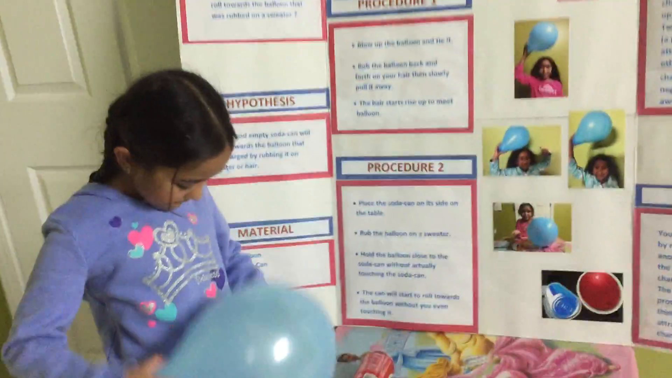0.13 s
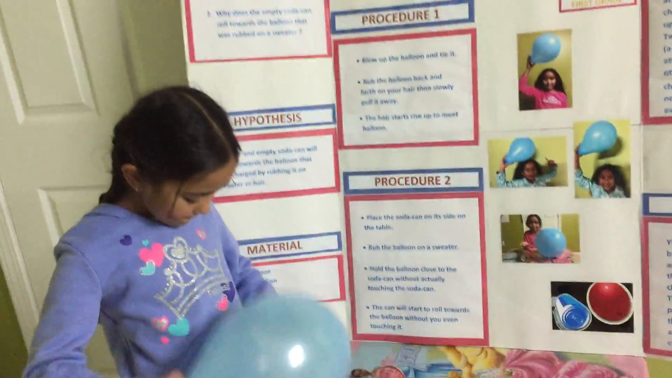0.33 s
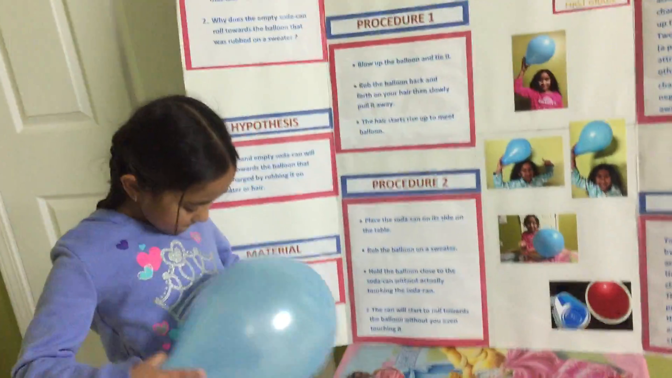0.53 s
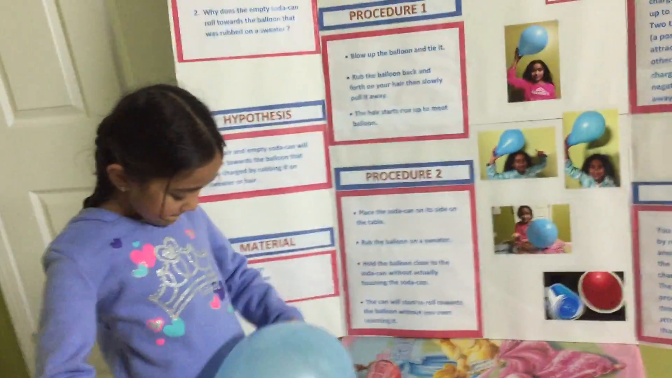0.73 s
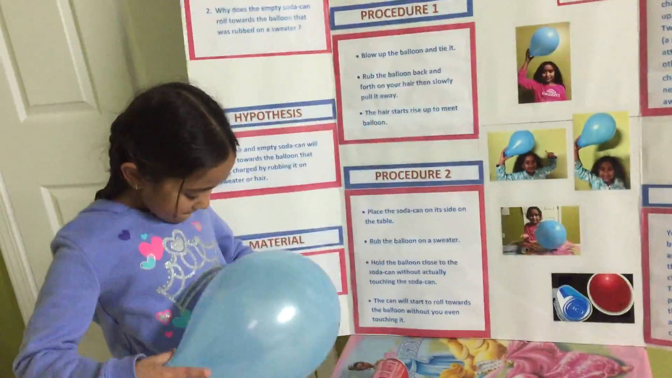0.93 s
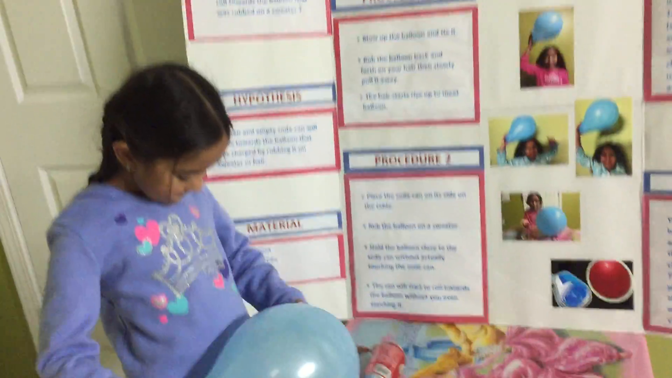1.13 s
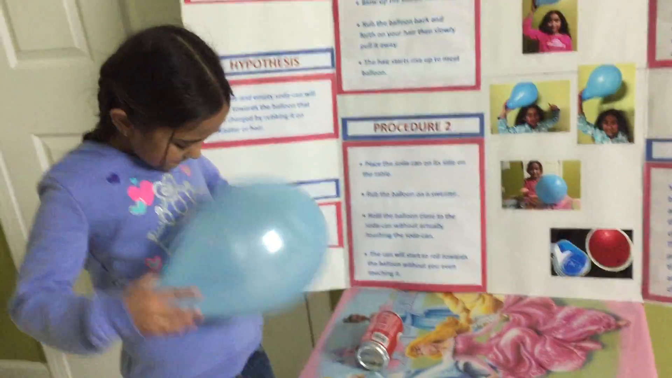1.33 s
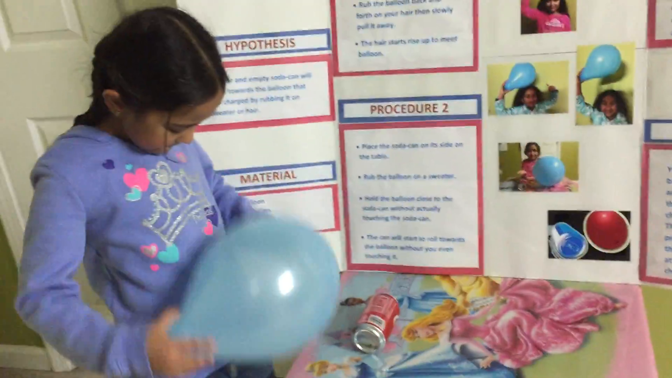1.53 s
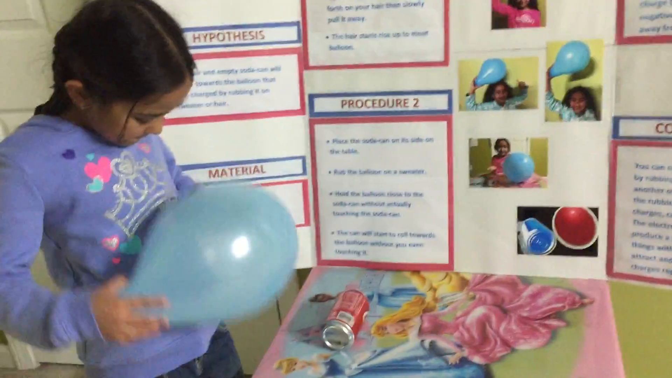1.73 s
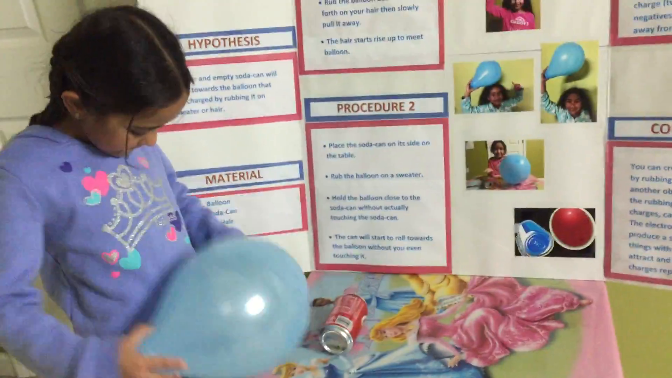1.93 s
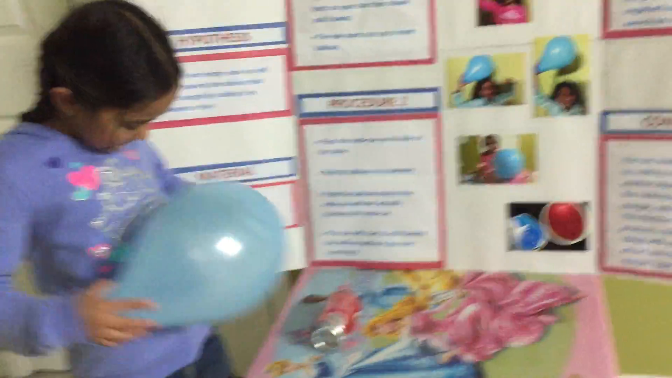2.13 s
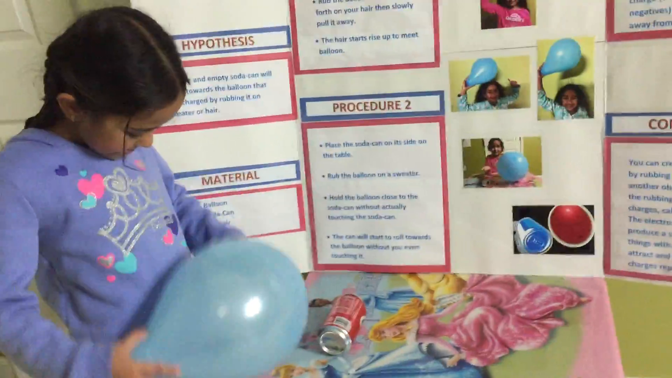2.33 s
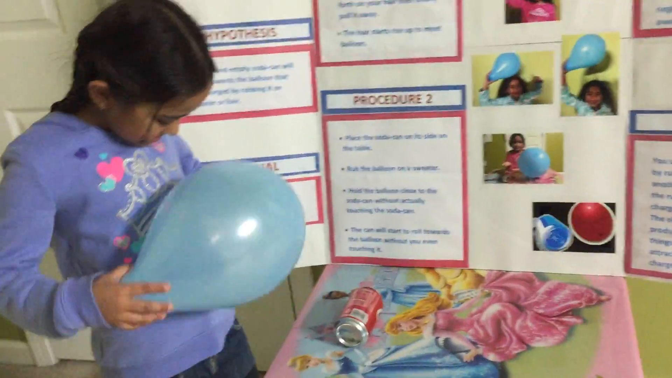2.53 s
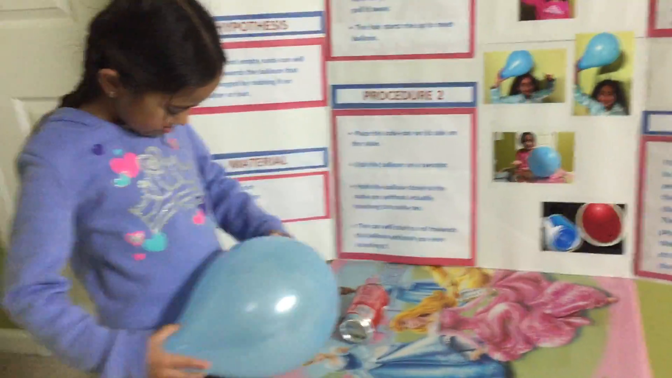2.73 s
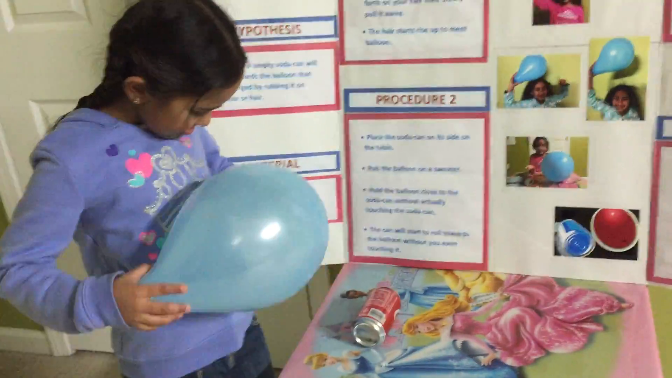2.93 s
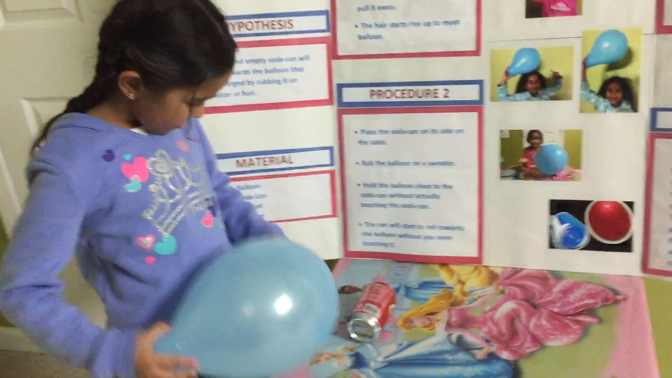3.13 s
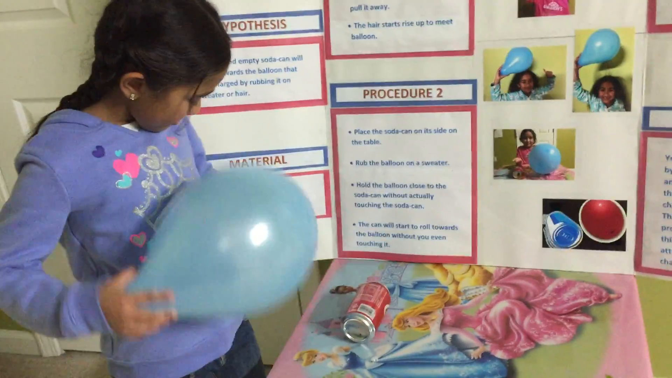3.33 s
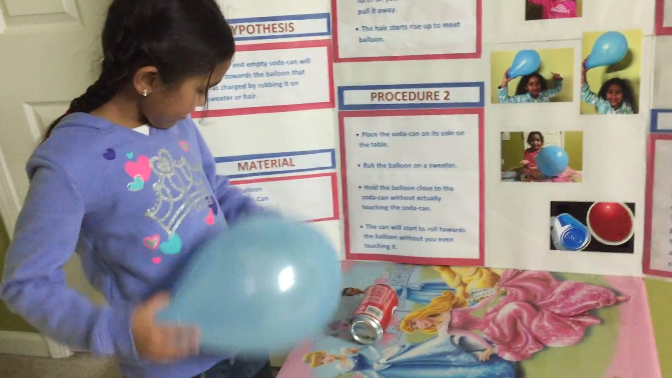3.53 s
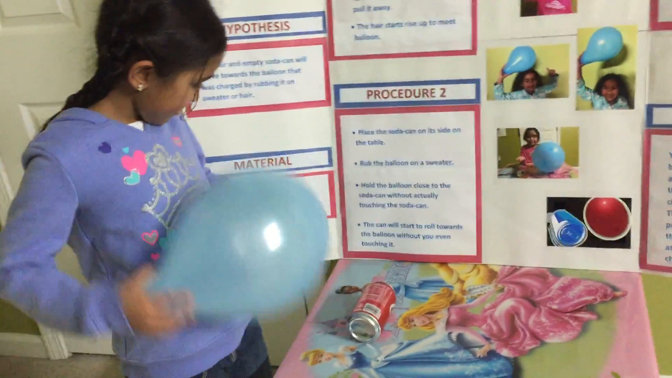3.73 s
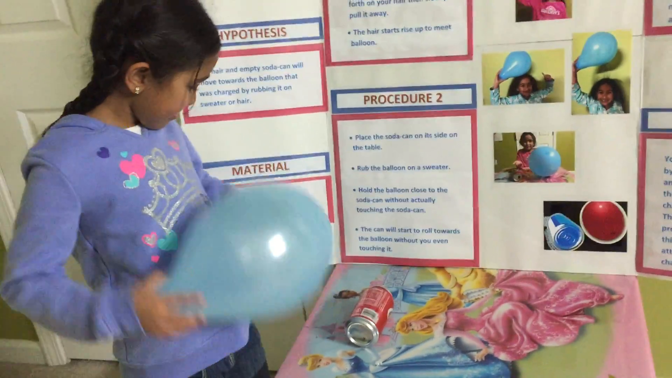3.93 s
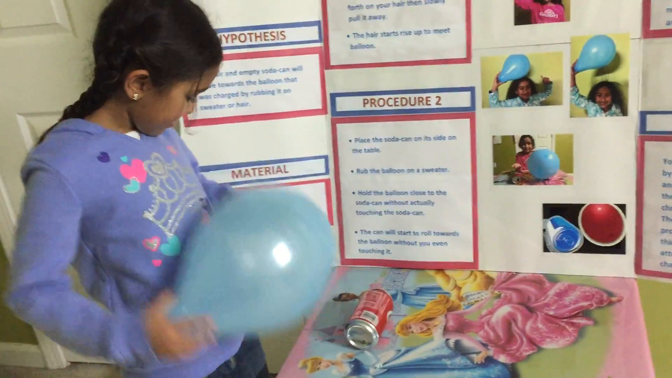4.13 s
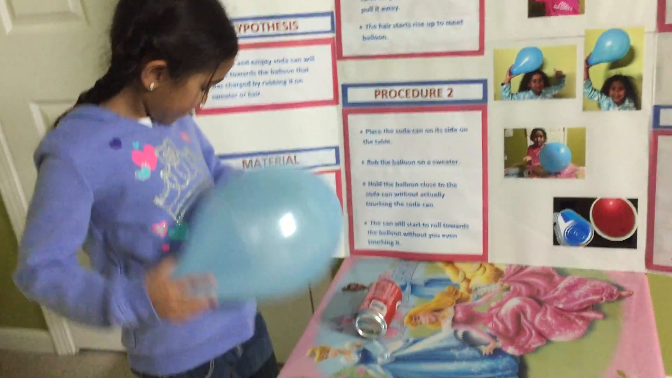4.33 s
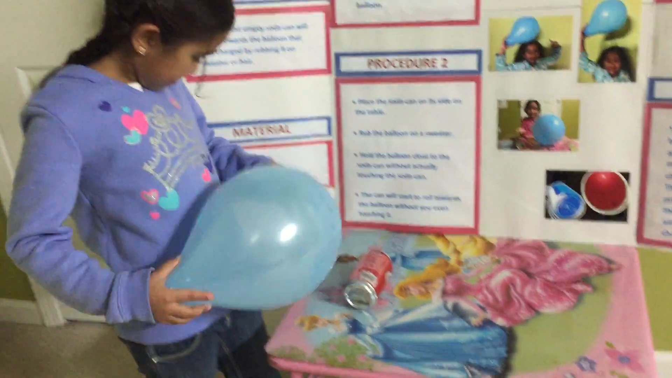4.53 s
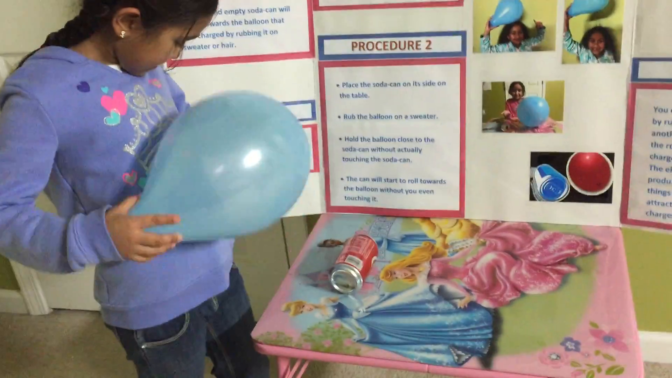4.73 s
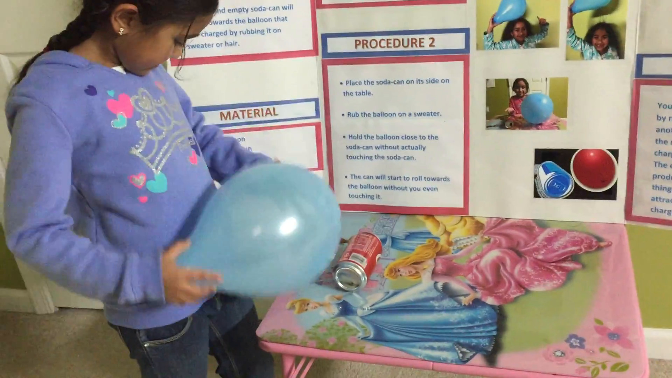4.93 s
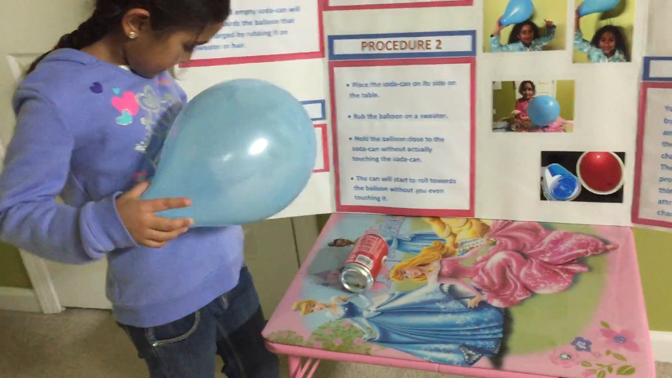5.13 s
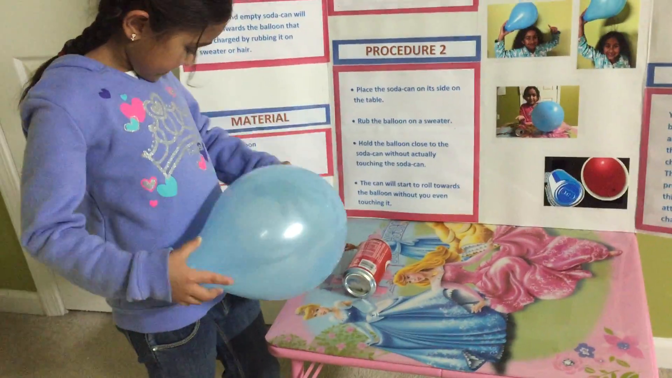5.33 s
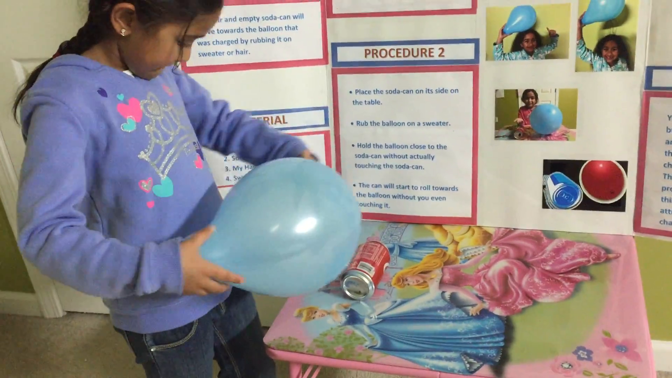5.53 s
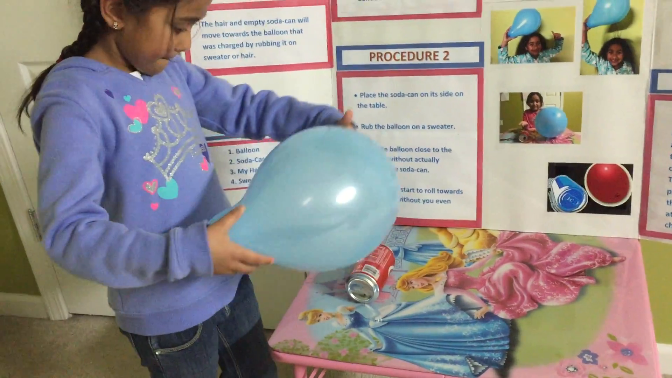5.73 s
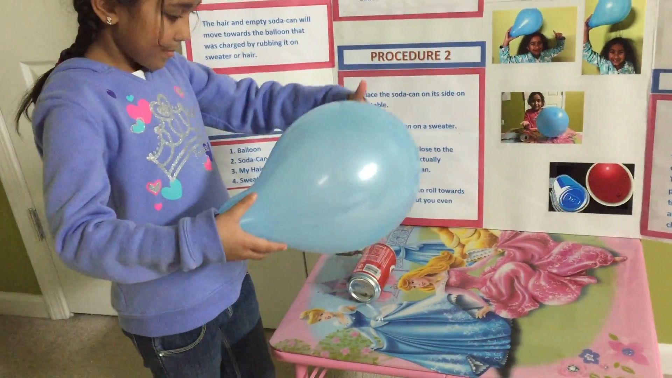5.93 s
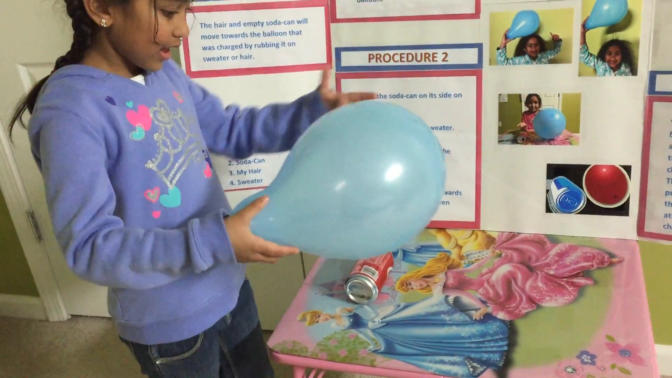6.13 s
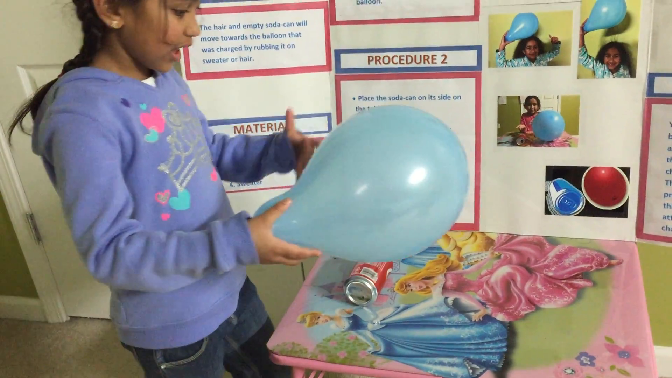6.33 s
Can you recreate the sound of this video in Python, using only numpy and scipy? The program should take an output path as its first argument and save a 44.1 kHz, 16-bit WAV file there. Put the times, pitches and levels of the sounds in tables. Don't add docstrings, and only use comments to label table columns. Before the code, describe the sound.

Brisk back-and-forth scratchy rubbing of an inflated rubber balloon on a knitted sweater, with scattered squeaky snaps and two loud, hollow pops of grip.

```python
import sys
import numpy as np
from scipy import signal
from scipy.fft import rfft, irfft, next_fast_len
from scipy.io import wavfile
from scipy.ndimage import uniform_filter1d

SR = 44100
rng = np.random.default_rng(int(sys.argv[2]) if len(sys.argv) > 2 else 0)


def attenuation_scalar(level_db):
    decades = np.asarray(level_db, float) / 20
    return 10 ** decades


def output_pcm(signal):
    pcm = np.clip(np.atleast_2d(signal).T, -1, 1) * 32767
    wavfile.write(sys.argv[1], SR, np.round(pcm).astype(np.int16))


N = 282151

# (turn [s], slip left at the turn [dB], rubbing strength [dB], skin ring over it [dB])
STROKES = [(-.14, -74, -56.5, -1), (0.164, -74, -55.5, -5), (0.392, -73.5, -56, -1),
           (0.635, -85, -55.5, -6), (0.871, -74, -56.5, 9.5), (1.104, -95, -57.5, -6),
           (1.302, -68, -58.5, -2), (1.525, -77, -54.5, -5.5), (1.75, -68.5, -55.5, -4),
           (1.954, -89, -55, -3), (2.15, -61, -56, -2.5), (2.338, -78, -54.5, -5.5), (2.516, -65, -55, 4),
           (2.704, -95, -54.5, -10), (2.892, -78, -55.5, -7), (3.101, -72.5, -57, -6),
           (3.256, -75, -58, -1.5), (3.446, -89, -56, -3.5), (3.622, -75, -59, -6), (3.808, -80, -54.5, -2),
           (3.983, -71, -55.5, -4.5), (4.183, -84, -54.5, -6.5), (4.369, -76, -56, -6),
           (4.55, -80, -54.5, -10), (4.721, -87.5, -57.5, -6), (4.892, -96, -54.5, -8),
           (5.067, -84, -54.5, -2.5), (5.287, -87, -55, -1), (5.5, -78, -66.5, 10.5)]
# (frequency [Hz], density [dB per Hz])
FIBRE_SPECTRUM = [(600, -37), (1500, -10.5), (3500, -4), (4900, -12), (5600, -1), (7000, -3.5),
                  (8200, -4.5), (9800, -2.5), (11500, 0.5), (14500, 1.5), (16500, -1)]
# (frequency [Hz], width [Hz], level [dB])
SKIN_MODES = [(640, 260, -13), (1000, 500, -12), (1460, 200, -6), (1900, 600, -6), (2450, 500, -3),
              (3000, 700, -4), (3700, 1100, -3), (4400, 900, -8)]
# (frequency [Hz], width [Hz], level [dB])
AIR_MODES = [(124, 27, 5.5), (227, 34, 1.5), (320, 130, 2.5)]
# (time [s], ring peak [dB], ring frequency [Hz], crack over the ring [dB])
TAUT_SNAPS = [(0.491, -40, 1500, 8.5), (.9078, -45.5, 1510, 11), (0.917, -35.5, 1490, 5.5),
              (0.9346, -31.5, 1460, 2), (1.3868, -38.5, 2740, 4), (1.5917, -46, 2380, 0),
              (1.6017, -36.5, 2830, -15), (1.7554, -44, 2500, -1.2), (1.774, -31, 2420, -5),
              (1.99, -43, 2710, -4), (1.9963, -40, 2540, -14), (2.0041, -32, 2670, -1),
              (2.012, -35.5, 2410, 4), (2.023, -33.5, 3500, 2), (2.049, -12.5, 2630, -12),
              (2.3498, -39.5, 2860, -18), (2.3774, -42.5, 2440, -8), (2.3801, -30.5, 2480, -8),
              (2.548, -33, 2000, 2), (2.5574, -34, 1640, 7), (3.267, -49.5, 2410, -11),
              (4.3482, -59, 3800, 17), (5.3524, -34, 3180, -2), (5.3555, -37.5, 2985, 16),
              (5.549, -33, 2340, 8), (5.5878, -20, 1190, 0.5), (5.5896, -26, 2540, -27),
              (5.679, -34, 1940, 7), (5.9376, -71.5, 2250, -16), (6.134, -77.5, 2460, 14)]
# (time [s], ring peak [dB], ring frequency [Hz], crack over the ring [dB])
DEEP_SNAPS = [(0.8932, -43.5, 4130, 10.5), (0.898, -44.5, 3300, 2.5), (0.9496, -35.5, 2560, 12.5),
              (0.9545, -25, 2740, 6), (1.1656, -55.5, 4560, -10.5), (2.04, -40, 2170, 3),
              (2.0455, -16, 1340, 6), (2.1706, -45, 2480, 6), (2.1834, -35.5, 2860, 5),
              (2.1900, -39.5, 2420, 0), (2.3640, -46.5, 2620, -12), (5.57, -64.5, 2500, 13.5),
              (2.5387, -37, 2430, 9.5), (2.595, -33.5, 1530, 11.5), (3.2277, -44.5, 4460, -2),
              (3.2962, -40, 2950, 6), (3.6414, -78, 3320, 32), (3.735, -47, 3330, 1),
              (4.0042, -46, 1320, 3), (4.0237, -35, 2450, -13), (4.2147, -48, 1520, 7),
              (4.2239, -36.5, 2730, 2), (4.3923, -58, 1309, -2), (4.4061, -39, 1500, 6),
              (5.4005, -20, 930, 12.5), (5.6396, -18, 2220, 3), (5.696, -44, 3420, -7),
              (5.7721, -27, 2340, 1.6), (5.9263, -40, 2450, -6)]
# (thump over the ring [dB], knock over the ring [dB])
TAUT_MOTION = (-21, -8.5)
DEEP_MOTION = (-10, 0.0)
# (delay [s], level for a snap of full force [dB])
AFTERSLIPS = [(.0014, -8.5), (.0029, -7), (.0058, -10.5)]
# (frequency [Hz], density [dB per Hz])
CRACK_SPECTRUM = [(300, -29.5), (1200, -11.5), (3000, -1.5), (4600, -2), (6300, 2), (8000, -7),
                  (10500, -4.5), (13000, -7.5), (16500, -15.5)]
# (frequency [Hz], t60 [s], level [dB])
KNOCK_MODES = [(600, 0.0086, 0.5), (814, 0.019, -6), (1210, .008, -13)]
# (frequency [Hz], t60 [s], level [dB])
THUMP_MODES = [(225, 0.011, -6.5), (318, 0.041, 2), (370, 0.045, 0.5)]
# (time [s], length [s], rms level [dB], dullness, scaling the
# treble cut [dB])
PEELS = [(0.872, 0.094, -50.5, 3), (0.951, 0.067, -48.5, 5), (1.593, 0.034, -57.5, 20),
         (1.667, 0.057, -51.5, -2), (1.996, 0.06, -55.5, 8), (2.04, 0.011, -31, -2.5),
         (2.14, 0.068, -49.5, 18), (2.54, 0.032, -50, 6), (2.591, 0.025, -47.5, -7),
         (3.218, 0.021, -52.5, 0), (4.007, 0.038, -48, 2), (4.386, 0.019, -53.5, 23),
         (5.345, 0.02, -38.5, 0), (5.404, 0.055, -40, 8.5), (5.43, .11, -54, 6), (5.557, 0.075, -50.5, 0),
         (5.582, 0.015, -36, 26), (5.65, 0.073, -48.5, 20), (2.055, 0.1, -47, 6.5), (5.919, .014, -57, 0.5),
         (5.67, 0.037, -50, 1.5)]
# (time [s], peak [dB])
BOOMS = [(0.491, -43.5), (0.953, -43), (1.161, -55), (1.389, -52), (1.615, -47.5), (1.669, -49),
         (2.046, -25), (2.179, -44.5), (2.596, -63), (3.003, -49), (3.3, -48), (3.881, -57), (4.018, -48),
         (5.194, -56.5), (5.353, -46.5), (5.402, -25), (5.588, -40), (5.638, -33.5), (5.681, -38.5),
         (5.773, -42), (5.923, -67)]
# (time [s], frequency [Hz], peak
# [dB], t60 [s])
PINGS = [(0.103, 1450, -55, 0.053), (0.105, 1730, -56, 0.055), (.957, 1650, -25, 0.019),
         (.999, 1380, -38, 0.018), (1.168, 756, -55, 0.024), (1.7744, 983, -32.5, 0.023),
         (1.776, 320, -48, 0.13), (2.047, 885, -18.5, 0.037), (2.05, 1570, -21, .02),
         (2.081, 1856, -28, 0.053), (2.547, 345, -37, 0.089), (2.594, 299, -35, 0.058),
         (3.296, 691, -46, .03), (3.74, 1513, -52.5, 0.078), (3.871, 207, -52, 0.068),
         (4.024, 1510, -41, 0.055), (4.024, 320, -37.5, 0.069), (4.352, 3880, -61, .011),
         (4.404, 333, -58, .088), (4.405, 1500, -40, .03), (5.402, 887, -15, 0.037),
         (5.402, 280, -20.5, 0.054), (5.6485, 1388, -29, 0.096), (5.774, 2191, -39, 0.045),
         (5.55, 870, -33, 0.019), (6.129, 8640, -50.5, .0062)]
# (delay [s], level [dB])
ECHOES = [(.0016, -15), (.0032, -12), (.0062, -15), (.0095, -18)]
# (frequency [Hz], t60 [s])
ROOM_DECAY = [(100, 0.21), (300, .25), (1000, 0.28), (3000, 0.2), (6500, 0.22), (8500, 0.21),
              (12000, 0.034)]
# (frequency [Hz], density [dB per Hz])
ROOM_TONE_SPECTRUM = [(25, -17), (64, -3), (110, -8.5), (245, -14.5), (300, -18), (850, -21), (2500, -25),
                      (5000, -32), (9000, -37), (15000, -35.5)]
# (frequency [Hz], gain [dB])
MICROPHONE = [(20, -14), (45, -10.5), (90, -4), (9700, 1.5), (10400, -3.5), (11200, -1.5)]


def rub():
    size_db = 1.2 * np.minimum(rng.exponential(1, N), 5) + 0.9 * drift(90) + 0.8 * drift(900)
    slips = patchy(attenuation_scalar(size_db) * rng.standard_normal(N), patchy_db=1.9)
    hiss = evened(coloured(slips, FIBRE_SPECTRUM))
    skin = sum(attenuation_scalar(db + 2.5 * drift(1400)) * evened(resonate(slips, hz, width))
               for hz, width, db in SKIN_MODES)
    air = sum(attenuation_scalar(db + 1.8 * drift(1500)) * evened(resonate(slips, hz, width))
              for hz, width, db in AIR_MODES)
    hiss_part = attenuation_scalar(5) * hiss * along_strokes(0, 0, 0, flat=1.43)
    skin_part = attenuation_scalar(-6) * evened(skin) * along_strokes(0, 0, 1, flat=0.92)
    air_part = attenuation_scalar(6) * evened(air) * along_strokes(-8, -14.5, 0.79, flat=1.0)
    return hiss_part + skin_part + air_part


def along_strokes(turn_db, top_db, per_skin, flat):
    rest_s, rest_db = 5.8, -90
    room_db, room_t60 = -3, 0.17
    turn_s, slip_db, rub_db, skin_db = np.transpose(STROKES)
    place = np.interp(np.arange(N) / SR, [*turn_s, rest_s], np.arange(len(turn_s) + 1))
    stroke = np.minimum(place.astype(int), len(turn_s) - 1)
    nearest_turn = np.round(place).astype(int)
    at_turn = attenuation_scalar(np.append(slip_db, rest_db)[nearest_turn] + turn_db)
    at_middle = attenuation_scalar(rub_db + top_db + per_skin * skin_db)[stroke]
    speed = 1 - (np.cos(np.pi * (place - stroke)) ** 2) ** flat
    power = (at_turn + (at_middle - at_turn) * speed) ** 2
    keep = attenuation_scalar(-120 / (room_t60 * SR))
    lingering = signal.lfilter([1 - keep], [1, -keep], power)
    return np.sqrt(power + attenuation_scalar(2 * room_db) * lingering)


def patchy(x, patchy_db):
    _, _, z = signal.stft(x, SR, nperseg=256)
    field = rng.standard_normal(z.shape[::-1]).T
    field = uniform_filter1d(field, size=5, axis=0)
    field = evened(uniform_filter1d(field, size=24, axis=1))
    return signal.istft(z * attenuation_scalar(patchy_db * field), SR, nperseg=256)[1][:len(x)]


def snaps():
    hard_db, slip_per_db = -24.5, 0.7
    slack_per_s, knock_per_crack = 60, 0.15
    rows = [(*row, *TAUT_MOTION) for row in TAUT_SNAPS] + [(*row, *DEEP_MOTION) for row in DEEP_SNAPS]
    out, cracks = np.zeros(N), np.zeros(N)
    chance = rng.random((len(rows), 8))
    for (s, db, hz, crack_db, thump_db, knock_db), c in zip(rows, chance):
        tear = torn_rubber()
        thump = sum(attenuation_scalar(d) * ring(f * (0.94 + 0.12 * c[7]), t60, 0) for f, t60, d in THUMP_MODES)
        knock = sum(attenuation_scalar(d) * ring(f * (0.922 + 0.26 * u), t60, 0)
                    for (f, t60, d), u in zip(KNOCK_MODES, c[2:]))
        add(out, s, attenuation_scalar(db + thump_db + 1) * thump)
        add(out, s, attenuation_scalar(db + knock_db + knock_per_crack * crack_db) * knock)
        force_db = min(db + max(crack_db, 0) / 2 - hard_db, 0)
        slips = [(0.00064, 0)] + [(delay, d + slip_per_db * force_db) for delay, d in AFTERSLIPS]
        for delay, slip_db in slips:
            f = hz * (1 - slack_per_s * delay)
            skin = ring(f, 0.004, 0)
            skin += attenuation_scalar(-1) * ring(f * (1.29 + 0.21 * c[0]), 0.0024, 6 * c[1])
            add(out, s + delay, attenuation_scalar(db + slip_db + 7.5) * skin)
            add(cracks, s + delay, attenuation_scalar(db + slip_db + crack_db + 12) * tear)
    return out + coloured(cracks, CRACK_SPECTRUM)


def torn_rubber():
    t = np.arange(600) / SR
    tear = rng.standard_normal(len(t)) * (attenuation_scalar(-17 - 60 * t / 0.006) + attenuation_scalar(-31 - 60 * t / 0.025))
    tear[0] = 1
    return tear / np.linalg.norm(tear)


def peels():
    out = np.zeros(N)
    grains = attenuation_scalar(3.4 * np.minimum(rng.exponential(1, N), 5)) * rng.standard_normal(N)
    grains *= rng.random(N) < 0.12
    grains *= attenuation_scalar(4.5 * drift(30))
    for s, length, db, dull_db in PEELS:
        run = grains[round(s * SR):][:round(length * SR)]
        spectrum = [(250, -12), (1500, 5.5), (3000, 1),
                    (6800, -0.7 * dull_db), (8200, -1.7 * dull_db), (15000, -2.5 * dull_db)]
        run = coloured(run, spectrum)
        add(out, s, attenuation_scalar(db) * evened(run) * signal.windows.tukey(len(run), 0.7))
    return out


def rings():
    boom_hz, boom_t60 = 134.5, 0.11
    out = np.zeros(N)
    for s, db in BOOMS:
        add(out, s, attenuation_scalar(db - 2.5) * ring(boom_hz, boom_t60, 0))
    for s, hz, db, t60 in PINGS:
        add(out, s, attenuation_scalar(db) * ring(hz, t60, 0))
    return out


def room(x, wet_db):
    taps = np.zeros(SR // 2)
    at = np.arange(200, len(taps) - 20, 20)
    taps[at + rng.integers(0, 20, len(at))] = rng.choice([-1., 1.], len(at))
    hz, t, z = signal.stft(taps, SR, nperseg=256)
    decay = attenuation_scalar(-60 * t / read(ROOM_DECAY, hz)[:, None])
    tail = signal.istft(z * decay, SR, nperseg=256)[1]
    tail *= 1 - 0.29 * np.exp(-np.arange(len(tail)) / (0.085 * SR))
    tail *= attenuation_scalar(wet_db) / np.linalg.norm(tail)
    tail[0] = 1
    for k, (s, db) in enumerate(ECHOES):
        tail[round(s * SR)] += (-1) ** k * attenuation_scalar(db)
    return signal.fftconvolve(x, tail)[:N]


def room_tone():
    noise = evened(coloured(rng.standard_normal(N), ROOM_TONE_SPECTRUM))
    return attenuation_scalar(-69 + 1.7 * drift(2500)) * noise


def evened(x):
    return x / np.sqrt(np.mean(x ** 2) + 1e-20)


def read(points, hz):
    f, value = np.transpose(points)
    return np.interp(np.log(hz + 1), np.log(f + 1), value)


def add(mix, s, sound):
    part = mix[round(s * SR):][:len(sound)]
    part += sound[:len(part)]


def coloured(x, spectrum):
    size = next_fast_len(len(x))
    gain = attenuation_scalar(read(spectrum, np.fft.rfftfreq(size, 1 / SR)))
    return irfft(rfft(x, size) * gain, size)[:len(x)]


def resonate(x, hz, width):
    b, a = signal.iirpeak(hz, hz / width, SR)
    return signal.lfilter(b, a, signal.lfilter(b, a, x))


def ring(hz, t60, phase):
    t = np.arange(round(0.16 * SR)) / SR
    onset = np.minimum(t * hz * 2, 1)
    return attenuation_scalar(-60 * t / t60) * np.sin(2 * np.pi * hz * t + phase) * onset


def drift(width):
    return evened(uniform_filter1d(uniform_filter1d(rng.standard_normal(N), width), width))


def scene():
    releases = room(snaps() + peels(), wet_db=-11)
    ringing = room(rings(), wet_db=-14)
    return (rub() + releases + ringing + room_tone())[None]


def roll_off(x):
    return signal.sosfilt(signal.butter(12, 16520, fs=SR, output="sos"), x)


def record(dry):
    top_hz, loud_db, top_db = 15330, -33, -20
    x = coloured(dry[0], MICROPHONE)[None]
    lowpass = signal.firwin(1023, top_hz, window=("kaiser", 9), fs=SR)
    low = signal.oaconvolve(x, lowpass[None], "same")
    loud = uniform_filter1d(x ** 2, 120) > attenuation_scalar(2 * loud_db)
    opening = uniform_filter1d(1. * loud, 200)
    mix = low + attenuation_scalar(top_db) * opening * (x - low)
    return roll_off(mix)


dry = scene()
out = record(dry)
output_pcm(out)
```